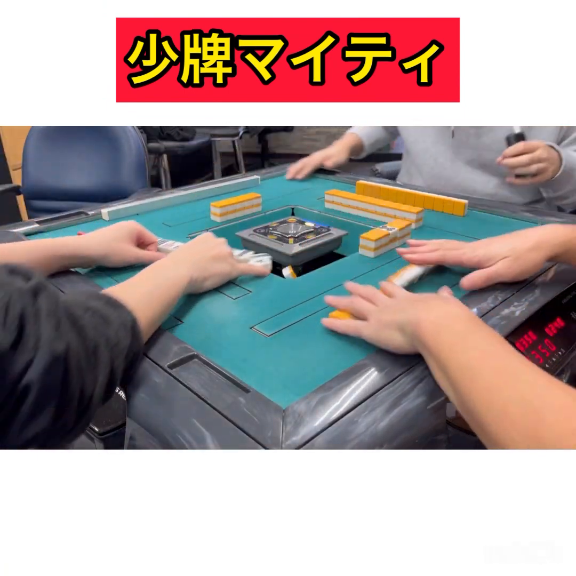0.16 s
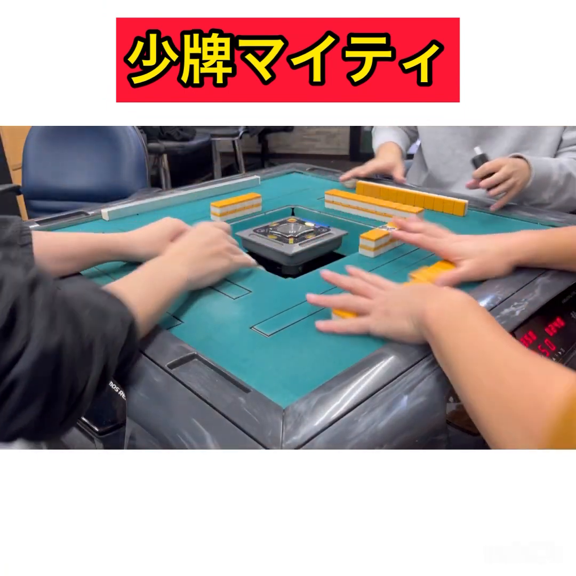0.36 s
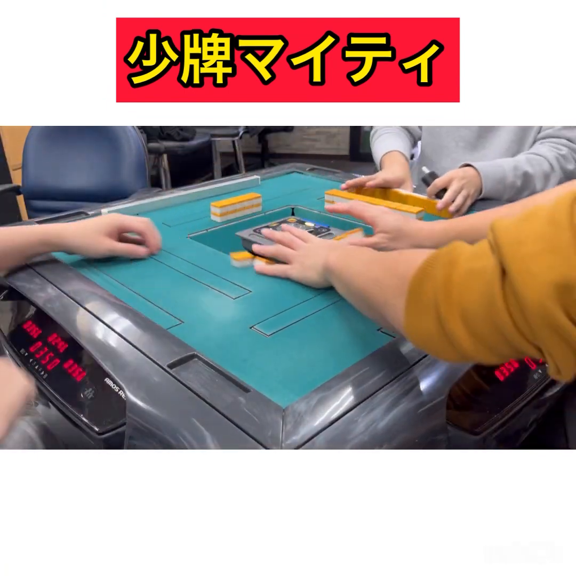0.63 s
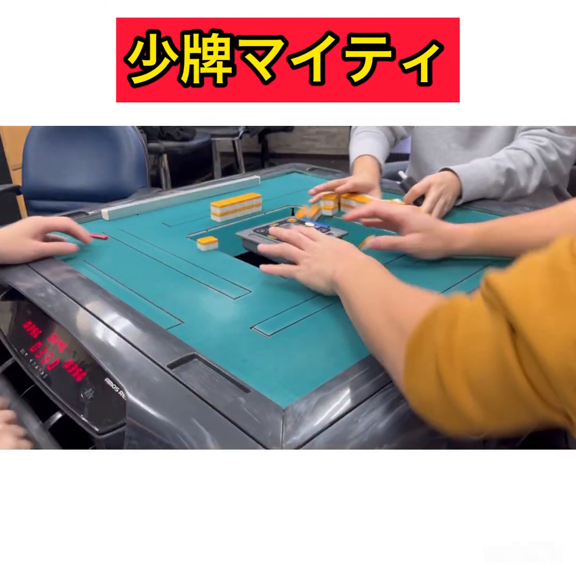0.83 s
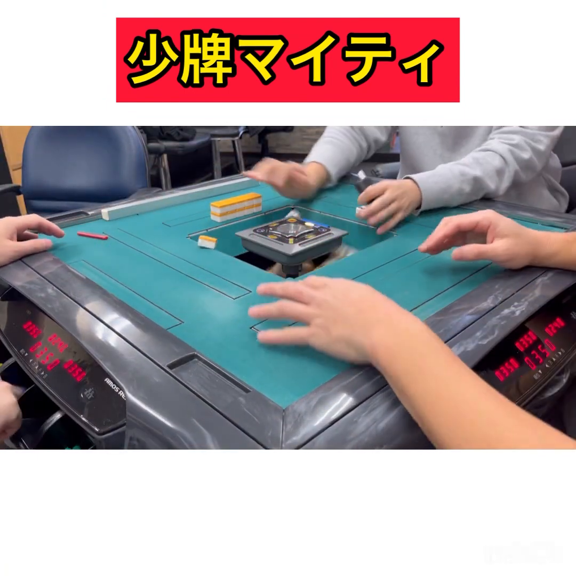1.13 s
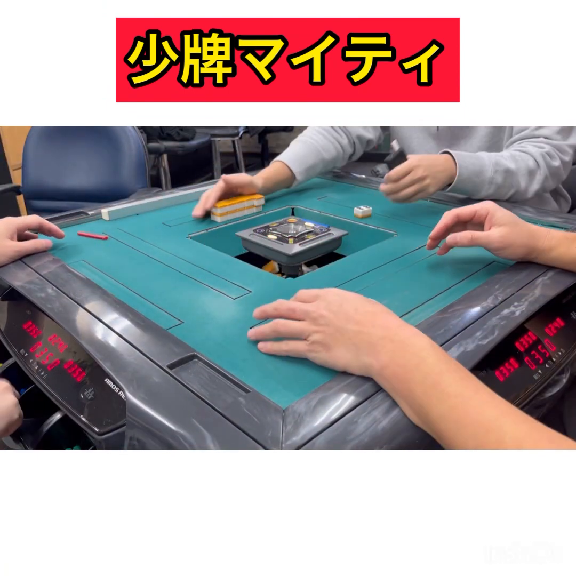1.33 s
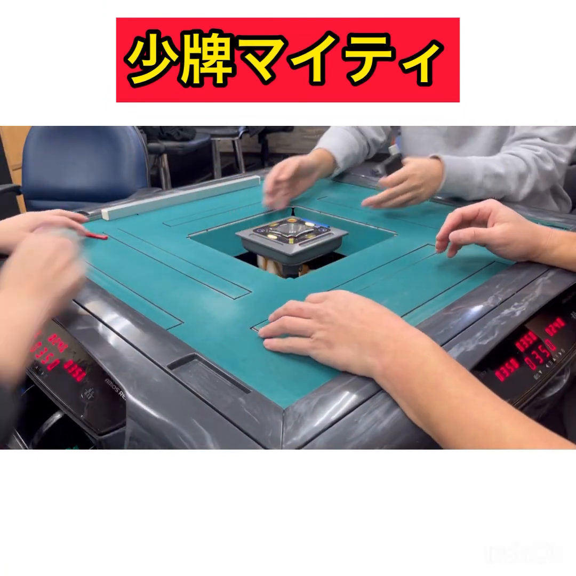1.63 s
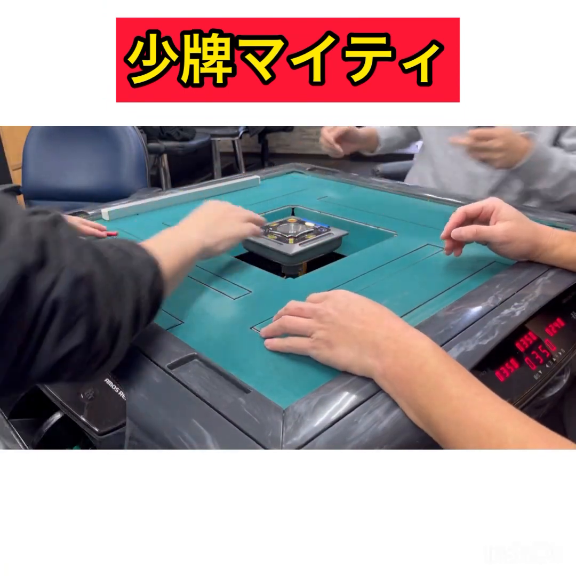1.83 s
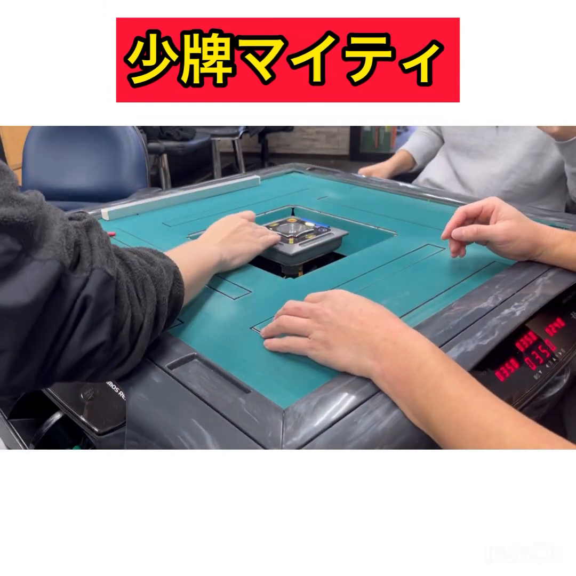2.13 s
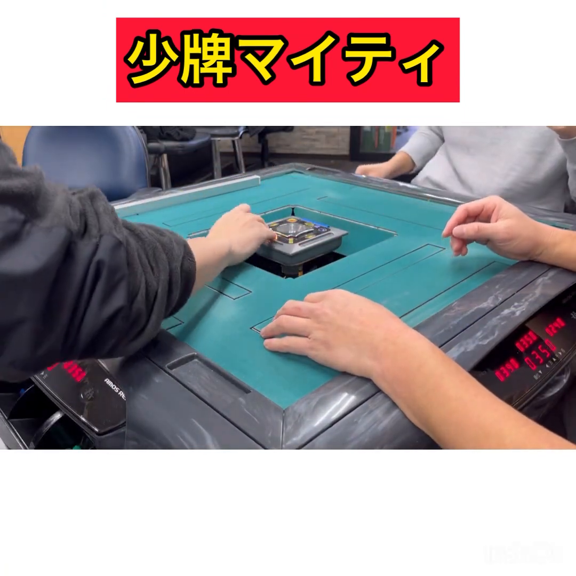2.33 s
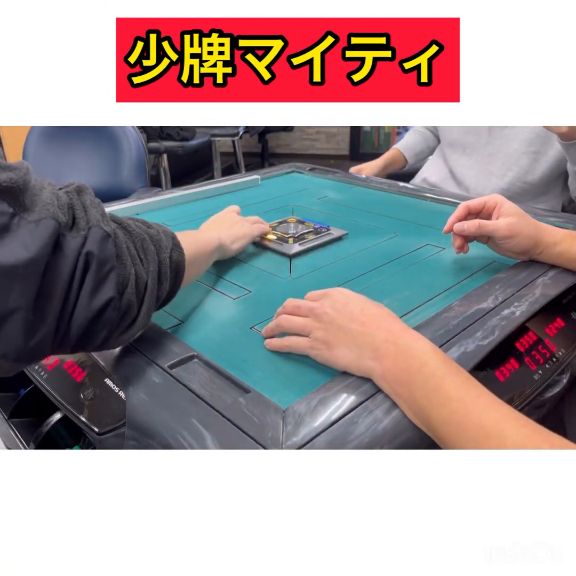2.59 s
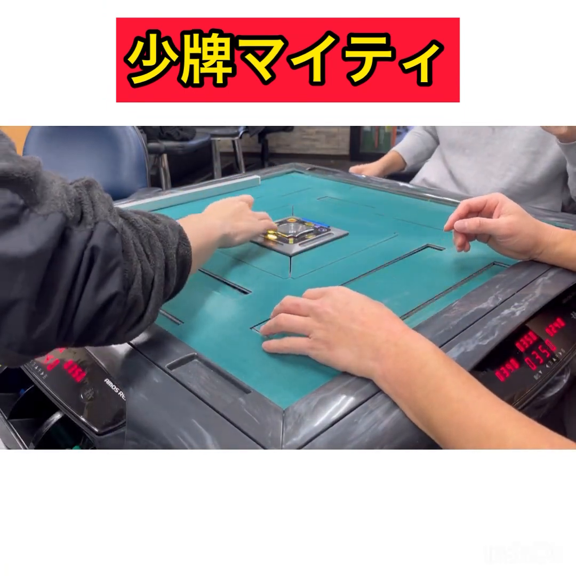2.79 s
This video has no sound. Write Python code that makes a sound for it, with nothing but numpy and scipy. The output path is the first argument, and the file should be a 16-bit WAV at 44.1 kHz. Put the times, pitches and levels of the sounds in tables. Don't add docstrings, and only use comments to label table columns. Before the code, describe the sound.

Plastic game tiles clack as hands sweep them into a table's booming hopper, then motorized lid whirrs

```python
import sys
import numpy as np
from scipy import signal
from scipy.fft import rfft, irfft
from scipy.io import wavfile
from scipy.ndimage import uniform_filter1d

SR = 44100
rng = np.random.default_rng(int(sys.argv[2]) if len(sys.argv) > 2 else 0)


def put_to_file(sound):
    columns = np.atleast_2d(sound).T
    safe = np.clip(columns, -1, 1)
    whole_steps = np.round(safe * 32767)
    wavfile.write(sys.argv[1], SR, whole_steps.astype(np.int16))


def volts_from_db(level):
    exponent = np.asarray(level, float) / 20
    return 10 ** exponent


N = 130095

# pitch_hz, level_db (per Hz)
HUM_COLOUR = [(12, -71.5), (20, -17.5), (85, 1), (133, -11), (171, -4.5), (252, -6.5), (800, -18),
              (15500, -61.5)]
HUM_DB = -42.5
# pitch_hz, level_db
MOTOR_LINES = [(164, -47), (300, -51.5)]
# pitch_hz, width_hz, level_db
GEAR_BANDS = [(1387, 130, -41), (2600, 190, -45.5), (4000, 260, -46)]
WHINE_FROM_S, WHINE_RISE_S = 2.8, 0.06
# time_s, level_db
LID_LEVEL = [
    (2.397, -43.5),
    (2.6, -41),
    (2.75, -39),
    (2.81, -34.5),
    (2.95, -42.5),
]
# pitch_hz, level_db (per Hz)
LID_COLOUR = [(300, -3.5), (800, -2), (1400, -3.5), (2700, -13.5), (7000, -23.5), (14000, -22)]
# time_s, pitch_hz, level_db
JUDDER = [
    (.12, 169.5, -39),
    (.228, 135, -26.5),
    (.27, 123, -41),
]
# start_s, peak_db, pitch_hz
KNOCKS = [(0.161, -26.5, 646), (0.226, -21.5, 720), (0.24, -12, 670), (0.639, -14.5, 690),
          (0.681, -11, 695), (1.214, -21.5, 505), (1.786, -23, 462), (2.046, -27, 572),
          (0.844, -19.5, 1280), (0.887, -18, 800), (1.33, -21.5, 507), (2.358, -43.5, 812)]
KNOCK_T60_S, KNOCK_DB = 0.044, 8
# start_s, peak_db, pitch_hz
THUDS = [(0.326, -21, 430), (0.368, -17.5, 377), (0.484, -13.5, 258), (0.529, -17, 240), (0.55, -18.5, 253),
         (0.609, -21, 312), (0.74, -16.5, 314), (0.763, -15.5, 221), (0.784, -10, 328), (0.802, -16, 251),
         (0.882, -9.5, 307), (0.905, -17.5, 241), (0.99, -18, 253), (1.07, -22, 364), (1.101, -11, 323),
         (1.135, -15, 259), (1.184, -16, 326), (1.224, -10.5, 235), (1.283, -11, 436), (1.345, -15.5, 440),
         (1.411, -11.5, 320), (1.447, -19.5, 292), (1.576, -20.5, 331), (1.629, -10.5, 248),
         (1.654, -17.5, 275), (1.787, -12, 276), (1.809, -19, 384), (1.869, -16, 364), (2.664, -19, 234)]
THUD_DB, THUD_T60_S, THUD_RISE_S = 1, 0.054, 0.0036
# start_s, length_s, level_db
FALLS = [(0, 0.32, -32), (0.336, 0.13, -28.5), (0.462, 0.11, -30.5), (0.611, 0.14, -25.5),
         (0.732, 0.13, -26), (0.845, .14, -27.5), (0.969, 0.23, -28), (1.173, 0.13, -24.5),
         (1.308, 0.18, -26), (1.533, 0.16, -27), (1.686, 0.12, -32), (1.789, 0.15, -33),
         (2.386, 0.3, -42.5), (2.609, 0.083, -33), (2.759, 0.096, -37)]
FALL_EDGE_S, DRUM_REST_DB = 0.019, -51.5
# pitch_hz, width_hz, level_db
DRUM_MODES = [(258, 26, -2), (307, 32.6, -3.5), (362.6, 22.6, -6.5), (407, 66, 2), (484.5, 49, -5.5),
              (718, 210, 1), (138.7, 33.4, -11.5)]
DROPS_PER_S, DROPS_SPREAD_DB = 300, 2.5
# time_s, level_db
SWEEP = [(0, -36.5), (.2, -48), (.3, -37.5), (.38, -33.5), (.6, -35), (.8, -29), (.97, -30), (1.04, -32.5),
         (1.15, -27), (1.3, -31.5), (1.44, -36), (1.52, -40.5), (1.6, -33.5), (1.8, -41), (2.0, -56),
         (2.3, -83.5), (2.6, -58), (2.95, -44)]
RATTLE_PER_S, RATTLE_DB, RATTLE_SPREAD_DB, RATTLE_T60_S = 300, 1, 1.5, 0.014
TICKS_PER_S, TICKS_DB, TICKS_SPREAD_DB = 1000, -0.5, -5.5
# pitch_ratio, level_db, t60_s
TILE_MODES = [(0.983, 4.5, 0.027), (0.87, 8, 0.0075), (.68, 0.5, 0.0046), (1.3, -9.5, 0.011),
              (2.2, -5, 0.015)]
# start_s, peak_db, pitch_hz
TAPS = [(0.246, -11, 1790), (0.3709, -8, 2480), (0.377, -8, 2980), (0.3883, -6.5, 3180),
        (0.4124, -1.5, 2920), (0.4339, -17.5, 1640), (0.4818, -16, 2650), (0.5432, -13, 2540),
        (0.6268, -16, 2480), (0.7013, -15, 1740), (0.7313, -9, 2850), (0.7371, -5, 2860),
        (0.7655, -14, 3080), (0.789, -23, 2490), (0.8869, -14, 1760), (0.895, -13, 3100),
        (0.9077, -14, 2830), (0.9414, -13, 1790), (0.9539, -10, 2960), (1.0118, -14, 1640),
        (1.038, -12.5, 2400), (1.1417, -0.5, 2770), (1.146, -6.5, 2350), (1.1844, -20.5, 2010),
        (1.2274, -16, 2470), (1.286, -17, 2750), (1.3494, -15, 1930), (1.3917, -16, 2400),
        (1.4593, -17, 2200), (1.5376, -20.5, 3230), (1.5824, -21, 2310), (1.5985, -21, 2900),
        (1.6256, -6, 2780), (1.6546, -7.5, 2690), (1.726, -18.5, 2600), (2.0421, -25, 2130),
        (2.8264, -19.5, 1570)]
TAP_DB, TAP_STRETCH = -7, 0.64
# start_s, peak_db
EDGE_TICKS = [(0.217, -25.5), (1.3924, -36), (1.5387, -22), (1.5504, -15.5), (1.7658, -22.5),
              (1.898, -30.5), (2.504, -33), (2.536, -30.5), (2.56, -34), (2.597, -33)]
EDGE_TICK_T60_S = 0.032
# start_s, peak_db, pitch_hz,
# crack_db
CLACKS = [(0.1236, -13, 2960, -18.5), (0.2258, -15, 1700, -19), (0.2386, -12.5, 3100, -6.5),
          (0.3271, -16, 2590, -6.5), (0.3652, -16, 2920, -5), (0.4115, -14, 2900, -37),
          (0.5033, -19.5, 2960, -6), (0.5236, -18, 2600, -5.5), (0.5633, -19.5, 2730, -39.5),
          (0.6375, -20.5, 2390, -2.5), (0.6784, -16.5, 1750, -30), (0.7341, -11.5, 3010, -6),
          (0.8173, -19, 2810, -25), (0.844, -18.5, 2940, -46), (0.8854, -14, 1765, -1.5),
          (0.9269, -15, 2920, -1), (1.1014, -19.5, 2260, 1.5), (1.1429, -18.5, 2290, -7),
          (1.167, -26.5, 2500, 9), (1.2107, -16.5, 2700, -5), (1.2512, -17, 1900, -7),
          (1.6238, -15.5, 2890, -4), (1.6536, -22, 2500, -0.5),
          (0.0044, -20.5, 2840, -36.5), (0.9093, -17.5, 2870, 1.5), (1.5733, -26, 2423, 2),
               (1.9373, -32, 1830, -10.5), (2.0143, -41, 2070, -15.5), (2.0433, -24, 2770, -49),
               (2.214, -48.5, 2420, -21), (2.36, -49, 1670, -33), (2.4012, -31, 2350, -42),
               (2.6207, -24, 2040, -3), (2.6579, -24, 1650, -37), (2.7594, -33.5, 1910, -2.5),
               (2.7835, -20.5, 1440, -32), (2.7963, -20.5, 1470, -39)]
# delay_s, level_db
BOUNCES = [
    (0, -4),
    (.0012, -2),
    (.0035, -9),
    (.007, -6.5),
    (0.011, -8),
]
# pitch_hz, level_db (per Hz)
CRACK_COLOUR = [(290, -16.5), (500, -6.5), (1060, -10), (2720, -10.5), (6450, -8.5), (8360, -12.5),
                (9510, -13.5), (13800, -19.5), (15500, -17)]
CRACK_T60_S, CRACK_DB, RING_DB = 0.19, 2.5, -1
LEAD_S, HUSK_DB, HUSK_T60_S = 0.009, -1, 0.058
LID_FROM_S, LID_RING_DB, LID_HUSK_DB = 2, -4, 5.5
ROOM_DB, ROOM_T60_S, ROOM_TOP_HZ = -15, 0.34, 5930
# pitch_hz, lead_rad
PORT_LEAD = [(350, 0.17), (1200, 0.97), (2000, 0.68), (3000, 0.46), (5000, 1), (8300, -3), (12000, -6.5),
             (14500, -8)]
# pitch_hz, likeness
PORT_LIKENESS = [(300, 0.96), (1200, 0.61), (2000, 0.94), (5000, 0.2), (12000, 1)]
LEFT_DB = 0.6
# low_hz, high_hz
MID_GAPS = [(7500, 9500), (13500, 19000)]
# low_hz, high_hz
SIDE_GAPS = [(1800, 2200), (10400, 13700)]
GAP_OPEN_S = [.61, 1.05]
GAP_EDGE, GAP_OPEN_HALF_S, QUIET_DB, LOUD_DB, TOP_HZ = 0.075, 0.012, -60, -30, 16000


def evened(x):
    return x / np.sqrt(np.mean(x ** 2) + 1e-20)


def read(points, hz):
    f, value = np.transpose(points)
    return np.interp(np.log(hz + 1), np.log(f + 1), value)


def curve(rows, axis=1):
    rows = np.asarray(rows)
    return np.interp(np.arange(N) / SR, rows[:, 0], rows[:, axis])


def add(mix, s, sound):
    part = mix[round(s * SR):][:len(sound)]
    part += sound[:len(part)]


def colour(x, points):
    spectrum_db = read(points, np.fft.rfftfreq(len(x), 1 / SR))
    return irfft(rfft(x) * volts_from_db(spectrum_db), len(x))


def impacts(per_s, spread_db):
    draw = rng.random((N, 2))
    return (draw[:, 0] < per_s / SR) * volts_from_db(-spread_db * np.log(draw[:, 1] + 0.017))


def hum():
    t = np.arange(8000) / SR
    out = volts_from_db(HUM_DB) * evened(colour(rng.standard_normal(N), HUM_COLOUR))
    for hz, db in MOTOR_LINES:
        mode = np.exp(-40 * t) * np.sin(2 * np.pi * hz * t)
        out += volts_from_db(db) * evened(signal.oaconvolve(rng.standard_normal(N), mode)[:N])
    return out


def room(x):
    t = np.arange(SR // 2) / SR
    tail = rng.standard_normal(len(t)) * volts_from_db(-60 * t / ROOM_T60_S) * (t > 0.004)
    tail = signal.lfilter(*signal.butter(1, ROOM_TOP_HZ, fs=SR), tail)
    return volts_from_db(ROOM_DB) * signal.oaconvolve(x, tail / np.linalg.norm(tail))[:N]


def whine():
    t, out = np.arange(2000) / SR, np.zeros(N)
    for hz, width, db in GEAR_BANDS:
        mode = t * np.exp(-np.pi * width * t) * np.sin(2 * np.pi * hz * t)
        out += volts_from_db(db) * evened(signal.oaconvolve(rng.standard_normal(N), mode)[:N])
    return np.clip((np.arange(N) / SR - WHINE_FROM_S) / WHINE_RISE_S, 0, 1) * out


def lid():
    gate = np.clip((np.arange(N) / SR - LID_LEVEL[0][0]) / 0.0055, 0, 1)
    return gate * volts_from_db(curve(LID_LEVEL)) * evened(colour(rng.standard_normal(N), LID_COLOUR))


def judder():
    t = np.arange(N) / SR
    gate = np.clip(np.minimum(t - JUDDER[0][0], JUDDER[-1][0] - t) / 0.0055, 0, 1)
    tone = np.sin(2 * np.pi * np.cumsum(curve(JUDDER)) / SR)
    return np.sqrt(2) * gate * volts_from_db(curve(JUDDER, axis=2)) * tone


def knocks():
    out, t = np.zeros(N), np.arange(5000) / SR
    for s, db, hz in KNOCKS:
        modes = sum(np.sin(2 * np.pi * r * hz * t) / r ** 2 for r in (0.87, 1, 1.12, 1.27, 2.5))
        for lag, less_db in ((0, 1), (0.006, -12.5)):
            fade = volts_from_db(db + KNOCK_DB + less_db - 60 * t / KNOCK_T60_S)
            add(out, s + lag, fade * np.minimum(t / 0.0031, 1) * modes / 2)
    return out


def thuds():
    out, t = np.zeros(N), np.arange(5000) / SR
    for s, db, hz in THUDS:
        fade = volts_from_db(db + THUD_DB - 60 * t / THUD_T60_S)
        add(out, s, fade * np.minimum(t / THUD_RISE_S, 1) * np.sin(2 * np.pi * hz * t))
    return out


def drum():
    hits, t, out = impacts(DROPS_PER_S, DROPS_SPREAD_DB), np.arange(6000) / SR, np.zeros(N)
    for hz, width, db in DRUM_MODES:
        mode = volts_from_db(db) * np.exp(-np.pi * width * t) * np.sin(2 * np.pi * hz * t)
        mode *= np.minimum(t / 0.0017, 1)
        out += signal.oaconvolve(hits * rng.standard_normal(N), mode)[:N]
    out = out / np.sqrt(uniform_filter1d(out ** 2, 3000) + 1e-9)
    t, level = np.arange(N) / SR, volts_from_db(DRUM_REST_DB)
    for s, length, db in FALLS:
        level = level + volts_from_db(db) * np.clip(np.minimum(t - s, s + length - t) / FALL_EDGE_S, 0, 1)
    return level * out


def ring(hz, stretch, detune):
    t, modes = np.arange(2000) / SR, 0
    for (ratio, db, t60), shift in zip(TILE_MODES, detune):
        modes = modes + volts_from_db(db - 60 * t / (t60 * stretch)) * np.sin(2 * np.pi * hz * ratio * shift * t)
    return modes * np.minimum(t / 0.0005, 1)


def rattle():
    hits, out = impacts(RATTLE_PER_S, RATTLE_SPREAD_DB), np.zeros(N)
    which = rng.integers(0, 60, N)
    for k, draw in enumerate(rng.random((60, 6))):
        tile = ring(1500 + 1900 * draw[5] ** 0.76, RATTLE_T60_S / 0.012, 0.94 + 0.14 * draw)
        out += signal.oaconvolve(hits * (which == k), tile)[:N]
    t = np.arange(600) / SR
    ticks = signal.oaconvolve(impacts(TICKS_PER_S, TICKS_SPREAD_DB), volts_from_db(-60 * t / 0.033))[:N]
    ticks = evened(colour(ticks * rng.standard_normal(N), CRACK_COLOUR))
    return volts_from_db(curve(SWEEP)) * (volts_from_db(RATTLE_DB) * evened(out) + volts_from_db(TICKS_DB + 6.5) * ticks)


def taps():
    out = np.zeros(N)
    for s, db, hz in TAPS:
        add(out, s, volts_from_db(db + TAP_DB) * ring(hz, TAP_STRETCH, np.ones(5)))
    return out


def edge_ticks():
    out, t = np.zeros(N), np.arange(4000) / SR
    for s, db in EDGE_TICKS:
        snap = np.diff(rng.standard_normal(len(t) + 2))
        snap = evened(colour(snap[1:] + snap[:-1], CRACK_COLOUR))
        add(out, s, volts_from_db(db - 60 * t / EDGE_TICK_T60_S) * snap)
    return out


def clacks():
    out, t = np.zeros(N), np.arange(4000) / SR
    for s, db, hz, crack_db in CLACKS:
        late = s > LID_FROM_S
        for (lag, less_db), u in zip(BOUNCES, rng.random((5, 6))):
            tile = ring(hz, 0.83, 0.9545 + 0.086 * u)
            add(out, s + lag * (0.7 + 0.6 * u[5]), volts_from_db(db + RING_DB + late * LID_RING_DB + less_db) * tile)
        flutter = evened(uniform_filter1d(rng.standard_normal(len(t)), size=80))
        noise = rng.standard_normal((2, len(t))) * volts_from_db(5 * flutter)
        crack = volts_from_db(crack_db + CRACK_DB - 60 * t / CRACK_T60_S) * evened(colour(noise[0], CRACK_COLOUR))
        band = [(0.55 - 0.25 * late) * hz, (1.45 + 0.3 * late) * hz]
        husk = evened(signal.lfilter(*signal.butter(2, band, "band", fs=SR), noise[1]))
        husk = volts_from_db(HUSK_DB + late * LID_HUSK_DB - 60 * t / HUSK_T60_S) * husk
        swell = volts_from_db(db) * np.minimum(t / LEAD_S, 1) ** 2
        add(out, max(s - LEAD_S / 2, 0), swell * (crack + husk))
    return out


def scene():
    machine = whine() + lid()
    table = judder() + knocks() + thuds() + drum()
    tiles = rattle() + taps() + edge_ticks() + clacks()
    near = signal.lfilter(*signal.butter(2, 70, "high", fs=SR), machine + table + tiles)
    whole = near + room(near) + hum()
    return np.array([whole, whole])


def gaps(hz, bands, loud):
    mask = np.ones((len(hz), len(loud)))
    pitch = hz[:, None]
    away_s = abs(np.arange(len(loud))[:, None] * 256 / SR - GAP_OPEN_S).min(1)
    shut = away_s > GAP_OPEN_HALF_S
    for low, high in bands:
        draw = np.repeat(rng.random((len(loud), 3)), 6, axis=0)[:len(loud)]
        above = pitch > low * (1 + GAP_EDGE * loud * draw[:, 0])
        below = pitch < high * (1 - GAP_EDGE * loud * (1 + draw[:, 1]) / 2)
        mask[above & below & shut] = 0
    return mask * (pitch < TOP_HZ)


def top_cut(x):
    return signal.sosfilt(signal.butter(12, 15740, fs=SR, output="sos"), x)


def record(dry):
    limited = 2 * np.tanh(dry[0] / 2)
    hz, t, z = signal.stft(limited, SR, nperseg=1024, noverlap=768)
    a, b = rng.standard_normal((len(t), len(hz), 2)).T
    scatter = uniform_filter1d(uniform_filter1d(a + 1j * b, size=3, axis=0), size=3, axis=1)
    same = np.clip(read(PORT_LIKENESS, hz), 0, 1)[:, None]
    odd = np.sqrt((1 - same) / 2) * scatter / abs(scatter)
    even = np.sqrt((1 + same) / 2)
    turn = np.exp(0.5j * read(PORT_LEAD, hz))[:, None] * volts_from_db(LEFT_DB / 2)
    left, right = z * (even + odd) * turn, z * (even - odd) / turn
    treble_db = 10 * np.log10((abs(z[hz > 4000]) ** 2).sum(0) + 1e-20)
    loud = np.clip((treble_db - QUIET_DB) / (LOUD_DB - QUIET_DB), 0, 1)
    mid = (left + right) / 2 * gaps(hz, MID_GAPS, loud)
    side = (left - right) / 2 * gaps(hz, SIDE_GAPS, loud)
    mid = mid * volts_from_db(-9 * (1 - loud) * (hz[:, None] > 9000))
    ports = signal.istft(np.array([mid + side, mid - side]), SR, nperseg=1024, noverlap=768)[1][:, :N]
    return top_cut(ports)


dry = scene()
out = record(dry)
put_to_file(out)
```